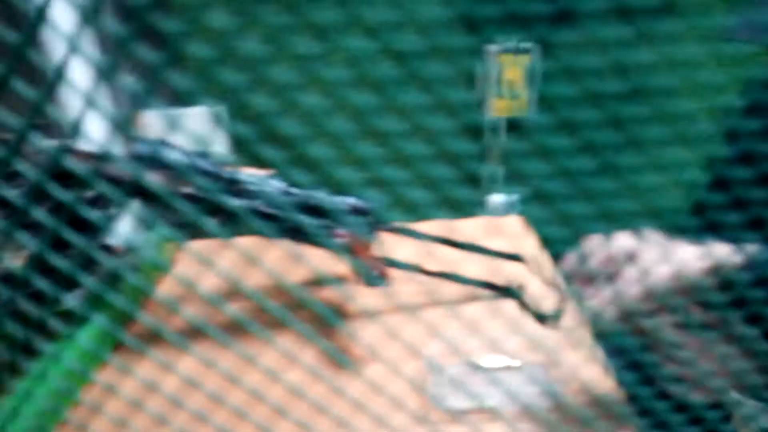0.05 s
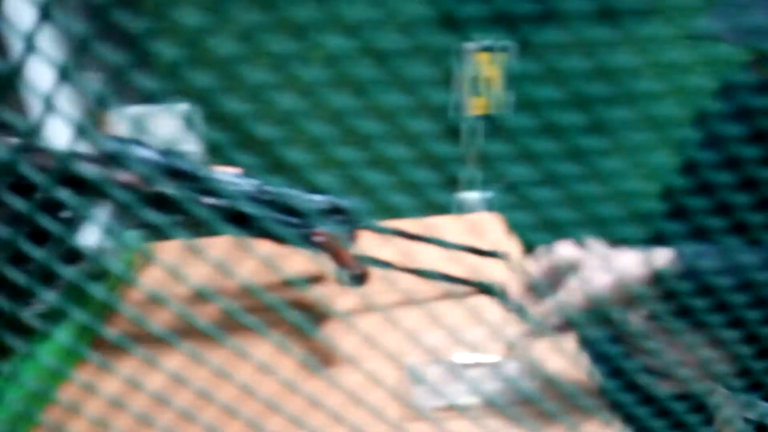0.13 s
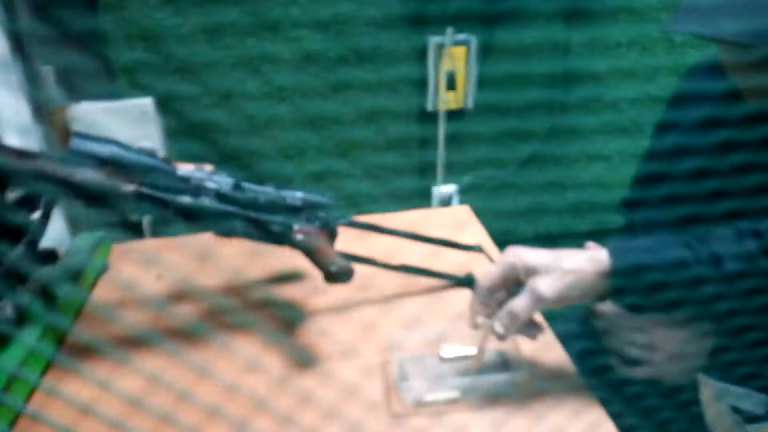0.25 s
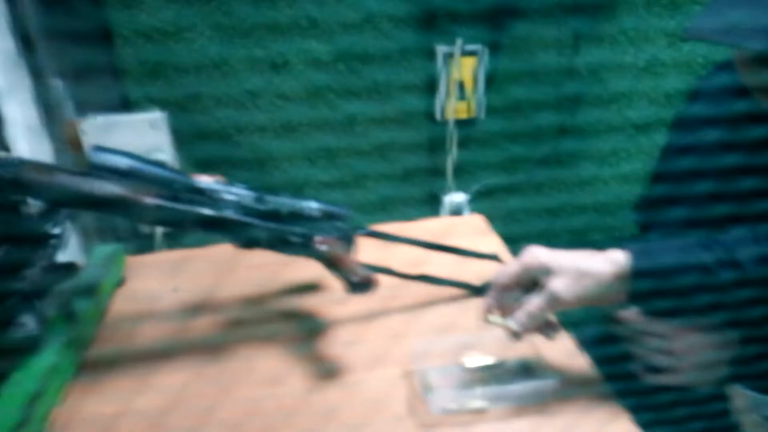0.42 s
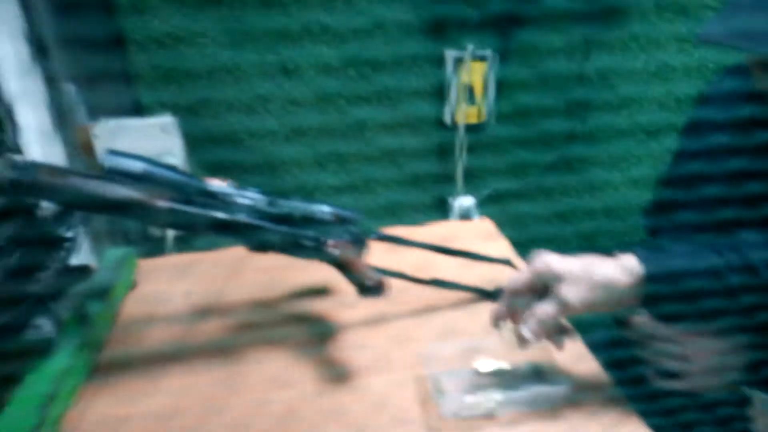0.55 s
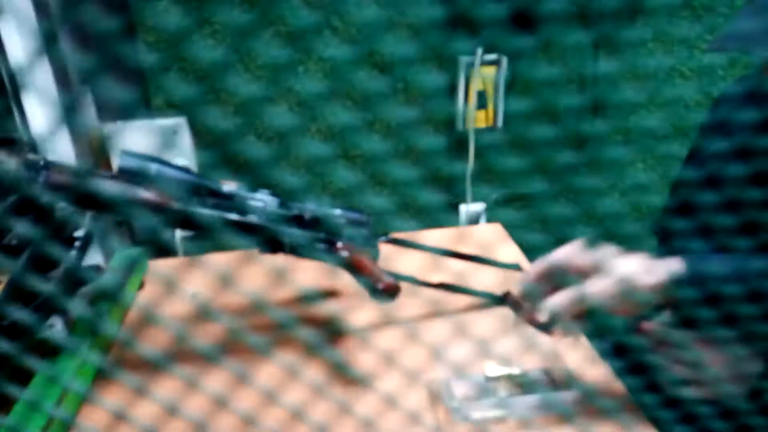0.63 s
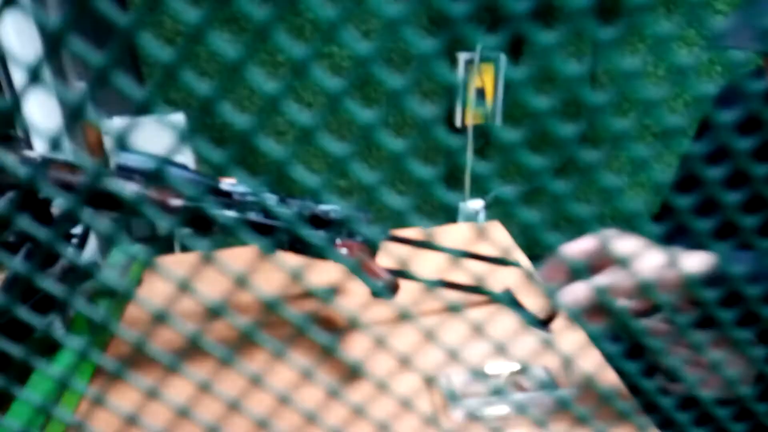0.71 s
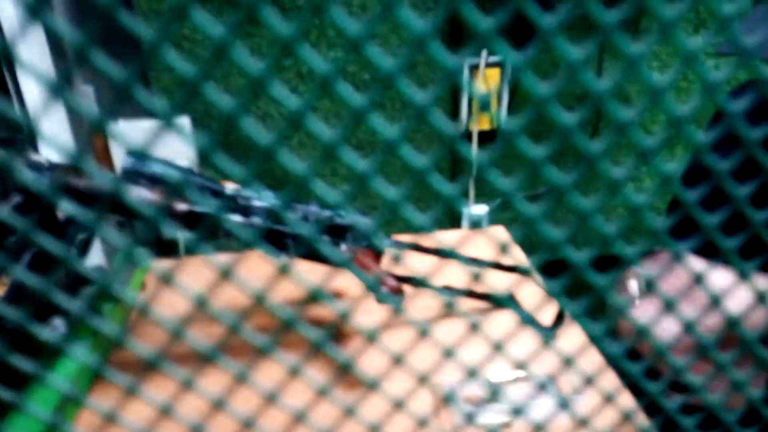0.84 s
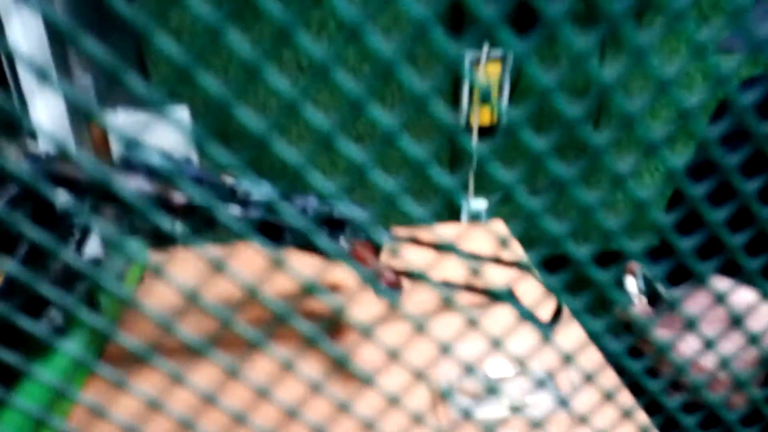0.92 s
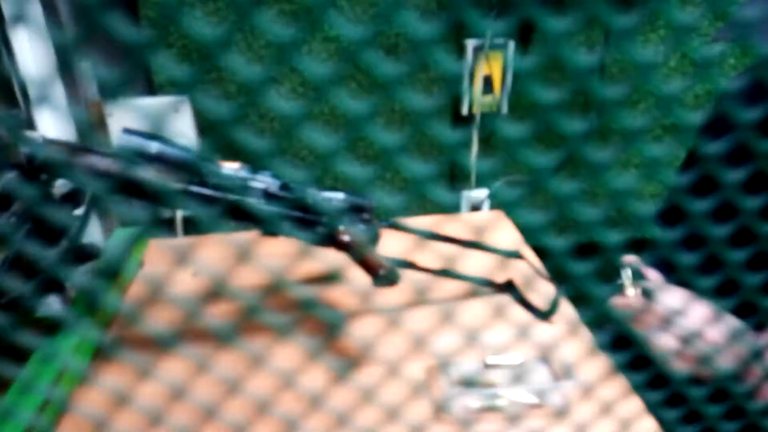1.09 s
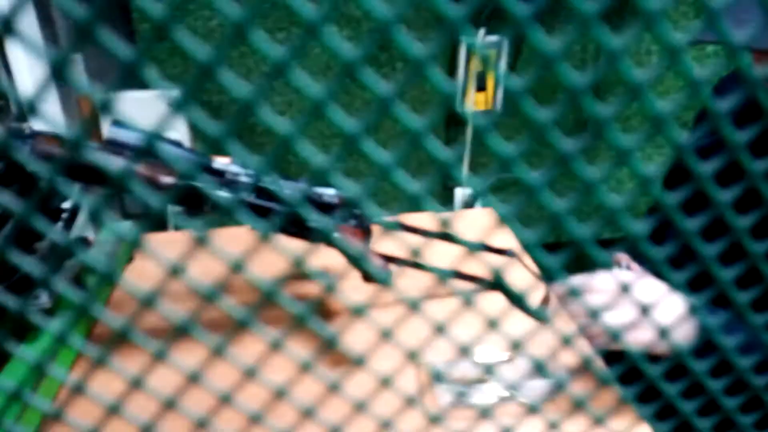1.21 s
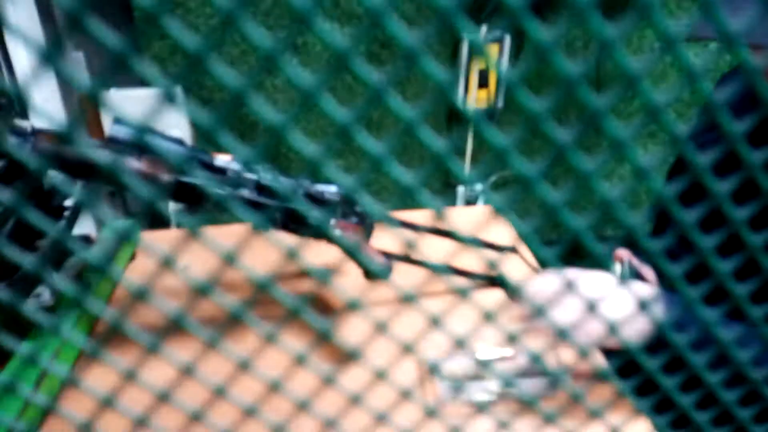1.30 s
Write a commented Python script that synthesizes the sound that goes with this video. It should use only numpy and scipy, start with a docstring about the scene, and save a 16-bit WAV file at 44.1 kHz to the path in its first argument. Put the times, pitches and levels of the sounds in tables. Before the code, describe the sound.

Small metal cartridges clack onto a wooden table at about 0.2 and 0.35 seconds, the top thumping softly. From 0.45 to 0.9 seconds they knock, grind faintly and clink together in a quick cluster with short, high rings. A light tap comes at 1 second, then a soft brush of hand and sleeve, and a few faint clinks around 1.3 seconds. The room behind is quiet.

```python
"""Small metal cartridges, set down by hand on a wooden table indoors and gathered up again.
Each knock is a short clack with a bright tick; the table top rattles and, under heavier contacts, booms.
Where cartridges touch they ring near 8.6 kHz until the fingers damp them; shuffled, they grind.
Hand and sleeve brush along in between, with one light tap, over a quiet room background."""
import sys
import numpy as np
from scipy import signal
from scipy.fft import rfft, irfft
from scipy.io import wavfile

SR = 44100
rng = np.random.default_rng(int(sys.argv[2]) if len(sys.argv) > 2 else 0)


def inscribe(sig):
    """Save sig as 16-bit PCM at rate SR to the path in sys.argv[1].

    A 1-D sig is mono; a 2-D sig holds one channel per row.
    Samples are clipped to [-1, 1] before scaling.
    """
    pcm = np.round(np.clip(np.atleast_2d(sig).T, -1, 1) * 32767)
    wavfile.write(sys.argv[1], SR, pcm.astype(np.int16))


N = 59535
TIME = np.arange(N) / SR

CONTACT_RISE_S, DETUNE, MODE_SPREAD_DB = .00024, .015, 1.2
# Landings: t/s, table top/dB, clack/dB, clack f/Hz, tick/dB, tick f/Hz, crack/dB
LANDINGS = [(0.2191, -22.5, -12, 1980, -7, 6500, -19), (0.3415, -29.5, -17.5, 2034, -12.5, 6350, -15),
            (0.426, -42, -19.5, 1995, -21.5, 6230, -22), (0.4510, -19, -10, 1830, -27, 6150, -14.5),
            (0.4750, -30, -29.5, 1930, -22, 6340, -47), (0.5010, -29.5, -15, 1980, -26, 5900, -30),
            (0.5160, -29.5, -19, 1840, -19, 6150, -35), (0.53, -41.5, -51, 1910, -25, 6700, -40),
            (0.5370, -35, -28, 1910, -22, 6140, -26), (0.5544, -53, -28.5, 1830, -19, 6600, -30),
            (0.557, -57, -35, 1890, -21, 5840, -27), (0.5863, -24, -20.5, 1990, -8, 6170, -9),
            (0.5940, -21.5, -10.5, 1907, -7.5, 6210, -18), (0.5968, -25, -34, 2000, -16, 7050, -20),
            (0.6050, -46, -30, 2000, -37, 6000, -18), (0.6452, -29.5, -21.5, 1940, -19.5, 6090, -33),
            (0.6762, -68, -28, 1900, -32, 6160, -32.5), (0.7281, -56, -28, 1920, -22.5, 6460, -26),
            (0.7337, -33, -16, 1910, -25, 6300, -25.5), (0.7366, -34, -15, 2030, -21.5, 5840, -36),
            (0.758, -66, -69, 1860, -39, 5800, -54), (0.7726, -23.5, -18, 1930, -8.5, 6200, -18),
            (0.7940, -53, -29, 1850, -26, 6230, -38), (0.8209, -37.5, -26.5, 1960, -15.5, 5970, -33),
            (0.8440, -51, -35, 1900, -23.5, 6240, -33), (0.866, -46, -33.5, 1920, -49, 6300, -46),
            (0.8844, -46, -31, 1965, -31, 6340, -38), (0.8894, -38, -31.5, 1850, -45, 6100, -54),
            (0.9438, -67, -40.5, 1950, -34.5, 6300, -55), (1.2779, -50, -39.5, 1940, -36, 7560, -43.5),
            (1.295, -52, -44.5, 2070, -47, 6400, -48), (1.3333, -44.5, -31.5, 2084, -47, 6000, -31)]
# Dull clack: ratio to clack f, level/dB, t60/s
CLACK_MODES = [(.93, -1.5, 0.01), (1.04, 0.5, 0.011), (1.52, -18, 0.002), (1.97, -9, 0.0077),
               (2.2, -10, 0.012)]
# Bright tick of the case: ratio to tick f, level/dB, t60/s
TICK_MODES = [(.93, -2.5, 0.0026), (1, 0, 0.0084), (1.13, -7, 0.0048), (1.5, -8, 0.0037),
              (2.32, -16, 0.0041)]
def knocks():
    """Clack and tick of each landing; every contact excites the modes a little differently."""
    out = np.zeros(N)
    for s, _, clack_db, clack_hz, tick_db, tick_hz, _ in LANDINGS:
        modes = [(clack_hz * ratio, clack_db + db, t60) for ratio, db, t60 in CLACK_MODES]
        modes += [(tick_hz * ratio, tick_db + db, t60) for ratio, db, t60 in TICK_MODES]
        for k, (hz, db, t60) in enumerate(modes):
            detune, strength = rng.standard_normal(2)
            gain = (-1) ** k * from_db(db + MODE_SPREAD_DB * strength)
            add(out, s, gain * ring(hz * (1 + DETUNE * detune), t60, CONTACT_RISE_S))
    return out


CRACK_T60_S, TAP_CRACK_DB = .0075, -23
# Contact noise spectrum: f/Hz, relative level/dB
CRACK_SPECTRUM = [(400, -10.5), (1400, -1.5), (2700, -4.5), (4000, 5.5), (5000, 1), (6200, 4), (7600, -5.5),
                  (9600, 0.5), (11500, -17), (13000, -15), (15000, -19)]
def cracks():
    """Each landing, and the tap, starts with a few milliseconds of broadband noise."""
    envelope = np.zeros(N)
    for s, *_, db in LANDINGS + [(TAP_S, TAP_CRACK_DB)]:
        add(envelope, s, from_db(db) * fade(CRACK_T60_S, CONTACT_RISE_S))
    return envelope * coloured_noise(CRACK_SPECTRUM)


RING_RISE_S, OVERTONE_RATIO = .00027, 1.678
TWIN_OFFSET_HZ, TWIN_DB, TWIN_T60_RATIO = 100, -9, .75
# Metal on metal: t/s, level/dB, f/Hz, t60/s, relative overtone level/dB
CLINKS = [(0.451, -24.5, 8660, 0.057, -4.5), (0.464, -27.5, 8665, 0.16, -22),
          (0.4906, -14, 8665, 0.093, -48), (0.5318, -23.5, 8490, 0.04, -31),
          (0.553, -27.5, 8520, 0.075, -26), (0.5570, -17, 8490, 0.04, -28), (0.5862, -5, 9300, 0.005, -20),
          (0.598, -15, 8660, 0.033, -18), (0.6660, -31, 8520, 0.051, -24), (0.7286, -18, 8520, 0.057, -23),
          (0.7325, -25.5, 8620, 0.027, -2), (0.7723, -12, 8360, 0.011, -11), (0.774, -15, 8666, 0.085, -10),
          (0.7935, -23, 8650, .05, -14), (0.8213, -12.5, 8614, 0.039, -24),
          (0.843, -28.5, 8550, 0.053, -22), (0.8820, -37.5, 8580, 0.03, -27),
          (0.9448, -35, 8540, 0.052, -42), (1.0855, -43.5, 8520, 0.018, -25),
          (1.2650, -43, 8060, 0.0093, -25), (1.277, -39.5, 8340, 0.034, -33),
          (1.3339, -32, 8740, 0.039, -17)]
def clinks():
    """Touching cartridges ring with a pitch and one overtone, each beating with a weaker twin mode."""
    out = np.zeros(N)
    for s, level_db, pitch_hz, t60, overtone_db in CLINKS:
        for hz, db in ((pitch_hz, level_db), (pitch_hz * OVERTONE_RATIO, level_db + overtone_db)):
            twin = ring(hz - TWIN_OFFSET_HZ, t60 * TWIN_T60_RATIO, RING_RISE_S)
            add(out, s, from_db(db) * ring(hz, t60, RING_RISE_S))
            add(out, s, from_db(db + TWIN_DB) * twin)
    return out


GRIT_PER_S, GRIT_SPREAD_DB = 900, 4
# Shuffles: peak t/s, level/dB, rise/s, fall/s
GRINDS = [(.50, -41, 0.015, 0.015), (.61, -40.5, 0.01, 0.036), (.84, -43, 0.043, 0.016)]
# Grit spectrum: f/Hz, relative level/dB
GRIT_SPECTRUM = [(300, 1.5), (1200, -6), (1900, 7), (2800, -39), (4200, 1), (6200, 2.5), (8500, 1.5),
                 (11500, -21), (15000, -20)]
def grinding():
    """Shuffled cartridges grind in dense, tiny slips of metal on metal."""
    sizes = from_db(GRIT_SPREAD_DB * np.minimum(rng.exponential(1, N), 3))
    signs = rng.choice([-1, 1], N)
    slips = rng.random(N) < GRIT_PER_S / SR
    return swells(GRINDS) * coloured(sizes * signs * slips, GRIT_SPECTRUM)


TAP_S, TAP_DB = 1.011, -20
# Tap modes: f/Hz, relative level/dB, t60/s
TAP_MODES = [(380, -24.5, 0.063), (494, -18, 0.048), (562, -15.5, 0.031), (702, -16.5, 0.066),
             (871, -18.5, 0.12), (1484, -13.5, 0.038), (1916, -12, 0.032), (2110, -14, 0.024),
             (2580, -12, 0.016), (3490, -19.5, 0.033), (5550, 1, 0.0035), (6270, 5, 0.0069),
             (7000, -4.5, 0.0057)]
def tap():
    """One light tap without boom as the hand draws back."""
    out = np.zeros(N)
    for k, (hz, db, t60) in enumerate(TAP_MODES):
        add(out, TAP_S, (-1) ** k * from_db(TAP_DB + db) * ring(hz, t60, CONTACT_RISE_S))
    return out


BOARD_RISE_S = .0013
# Crowded table-top modes: f/Hz, relative level/dB, t60/s
BOARD_WASH = [(60, -17, 0.098), (148, -10, 0.19), (306, -2.5, 0.19), (563, -1, 0.14), (886, 9, 0.075),
              (1300, 1, 0.039), (2220, -4.5, 0.094), (3980, 2.5, 0.025), (8800, -0.5, 0.04),
              (15100, -38, 0.016)]
# Clear table-top modes: f/Hz, relative level/dB, t60/s
BOARD_MODES = [(505, -14.5, 0.099), (574, -12.5, 0.12), (704.7, -16, 0.12), (867, -16.5, 0.11),
               (1255, -16.5, 0.088), (1470, -10.5, 0.078), (1649, -15.5, 0.13), (1767, -16.5, 0.064)]
def table_top():
    """The board answers each landing with a wash of crowded modes and a few clear ones."""
    out, t = np.zeros(N), TIME[:N // 4]
    bands = [(hz, band * from_db(at_hz(BOARD_WASH, hz))) for hz, band in noise_bands()]
    wash_rms = np.std(sum(band for _, band in bands))
    attack = 1 - np.exp(-t / BOARD_RISE_S)
    decays = [np.exp(-np.log(1000) * t / at_hz(BOARD_WASH, hz, column=2)) for hz, _ in bands]
    for s, board_db, *_ in LANDINGS:
        start = rng.integers(N // 8, N - len(t))
        wash = sum(band[start:start + len(t)] * decay for (_, band), decay in zip(bands, decays))
        add(out, s, from_db(board_db) * attack * wash / wash_rms)
        for hz, db, t60 in BOARD_MODES:
            add(out, s, from_db(board_db + db) * ring(hz, t60, BOARD_RISE_S))
    return out


BOOM_RISE_S = .016
# Heavier contacts: t/s, level/dB
THUMPS = [(0.224, -35.5), (0.351, -39.5), (0.453, -38.5), (0.503, -41.5), (0.589, -32), (0.737, -43.5)]
# Low table modes: f/Hz, relative level/dB, t60/s
BOOM_MODES = [(98, 1, 0.23), (162.6, -8, 0.3), (238.5, -3.5, 0.15), (316, -6.5, 0.34)]
def booms():
    """Low modes of the whole table build up slowly and hang on."""
    out = np.zeros(N)
    for s, level_db in THUMPS:
        for hz, db, t60 in BOOM_MODES:
            add(out, s, from_db(level_db + db) * ring(hz, t60, BOOM_RISE_S))
    return out


BRUSH_START_S = .225
# Hand strokes: peak t/s, level/dB, rise/s, fall/s
BRUSHES = [(0.311, -40.5, 0.022, 0.064), (.395, -45, 0.12, 0.032), (.67, -46, .04, 0.038),
           (0.981, -51.5, 0.038, 0.045), (1.101, -47, .01, 0.04), (1.134, -40.5, 0.021, 0.013),
           (1.18, -60, .03, 0.17)]
# Friction spectrum: f/Hz, relative level/dB
BRUSH_SPECTRUM = [(88, -47), (150, -27), (209, -14), (550, -4.5), (766, -8.5), (1150, -4), (3480, -11),
                  (3980, -4.5), (9730, -12.5), (12000, -26), (15500, -20)]
def brushing():
    """Friction hiss of hand and sleeve, silent until the first cartridge has landed."""
    return (TIME > BRUSH_START_S) * swells(BRUSHES) * coloured_noise(BRUSH_SPECTRUM)


# Nearest walls: delay/s, level/dB
ECHOES = [(.0049, -21.5), (.0108, -22.5), (.0215, -27)]
def wall_echoes(x):
    """Single reflections make the ringing flutter."""
    return sum(from_db(db) * np.interp(TIME - delay_s, TIME, x, left=0) for delay_s, db in ECHOES)


SCATTER_DELAY_S, ROOM_DELAY_S = .0015, .008
# Early scatter off nearby surfaces: f/Hz, level/dB, t60/s
SCATTER = [(200, -1.5, 0.089), (1940, -9, 0.025), (5900, -11, 0.046), (8500, -9, 0.069), (15300, -4, 0.044)]
# Room tail: f/Hz, level/dB, t60/s
ROOM_TAIL = [(102, 2, 0.76), (505, -9, 0.32), (1900, -14.5, 0.3), (2800, -12, 0.13), (6000, -28, 0.28),
             (8400, -22, 0.083), (15000, -12.5, 0.072)]
def reflections(x, table, delay_s):
    """Diffuse echoes that die away band by band."""
    response = np.zeros(N)
    for hz, band in noise_bands():
        rate = np.log(1000) / at_hz(table, hz, column=2)
        decay = np.exp(-rate * TIME) * np.sqrt(2 * rate / SR)  # unit energy
        add(response, delay_s, band[::-1] * decay * from_db(at_hz(table, hz)))
    return signal.fftconvolve(x, response)[:N]


FLOOR_DB = -61.5
# Background spectrum: f/Hz, relative level/dB
FLOOR_SPECTRUM = [(15, -53), (25, -23), (113, -3), (164, -7.5), (445, -11), (997, -17), (1110, -23),
                  (2120, -11.5), (2300, -14.5), (2700, -20.5), (3630, -8.5), (4870, -28.5), (5880, -9.5),
                  (8130, -33.5), (9050, -22), (11800, -37), (15500, -35)]
def background():
    """Faint, steady rumble and hiss."""
    return from_db(FLOOR_DB) * coloured_noise(FLOOR_SPECTRUM)


def from_db(db):
    """Decibels to gain."""
    return 10 ** (np.asarray(db) / 20)


def at_hz(table, hz, column=1):
    """Interpolate a table column over log frequency."""
    table = np.array(table)
    return np.interp(np.log(np.maximum(hz, 1)), np.log(table[:, 0]), table[:, column])


def add(out, s, sound):
    """Mix a sound in at s seconds."""
    start = int(np.clip(s * SR, 0, N - 1))
    part = sound[:N - start]
    out[start:start + len(part)] += part


def fade(t60, rise_s):
    """Quick rise, exponential decay."""
    t = TIME[:int(np.clip(t60 * 2 * SR, 2, N))]
    return np.exp(-np.log(1000) * t / t60) * (1 - np.exp(-t / rise_s))


def ring(hz, t60, rise_s):
    """One struck mode."""
    envelope = fade(t60, rise_s)
    return envelope * np.sin(2 * np.pi * hz * TIME[:len(envelope)])


def swells(rows):
    """Gain of two-sided Gaussian swells, summed in power."""
    power = np.zeros(N)
    for s, db, rise_s, fall_s in rows:
        width_s = np.where(TIME < s, rise_s, fall_s)
        power += from_db(db) ** 2 * np.exp(-((TIME - s) / width_s) ** 2)
    return np.sqrt(power)


def coloured(source, spectrum):
    """Filter by a spectrum; rms 1."""
    hz = np.arange(N // 2 + 1) * SR / N
    shaped = irfft(rfft(source) * from_db(at_hz(spectrum, hz)), N)
    return shaped / np.sqrt(np.mean(shaped ** 2) + 1e-20)


def coloured_noise(spectrum):
    """Steady shaped noise; rms 1."""
    return coloured(rng.standard_normal(N), spectrum)


def noise_bands():
    """Half-octave bands of white noise as (centre f/Hz, band)."""
    edges_hz, white = np.geomspace(45, 17000, 18), rng.standard_normal((2, N))
    for k, (low, high) in enumerate(zip(edges_hz, edges_hz[1:])):
        bandpass = signal.butter(2, [low, high], "band", fs=SR, output="sos")
        yield np.sqrt(low * high), signal.sosfilt(bandpass, white[k % 2])


def scene():
    """Metal, table and hand in the room, over the background; mono."""
    floor, hand = background(), brushing()
    metal = knocks() + cracks() + clinks() + tap() + grinding()
    near = metal + wall_echoes(metal) + reflections(metal, SCATTER, SCATTER_DELAY_S) + table_top() + hand
    return (near + reflections(near, ROOM_TAIL, ROOM_DELAY_S) + booms() + floor)[None]


CEILING, CUTOFF_HZ = .53, 15650
def record(dry):
    """Soft clip, then a steep low-pass."""
    lowpass = signal.ellip(10, .2, 80, CUTOFF_HZ, fs=SR, output="sos")
    return signal.sosfilt(lowpass, CEILING * np.tanh(dry / CEILING))


dry = scene()
out = record(dry)
inscribe(out)
```